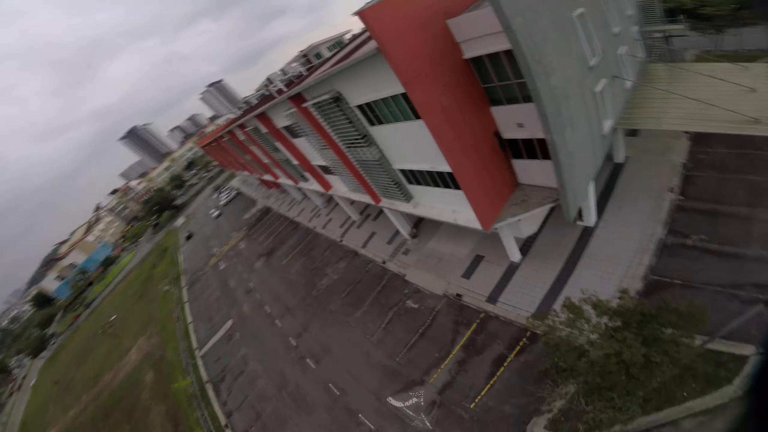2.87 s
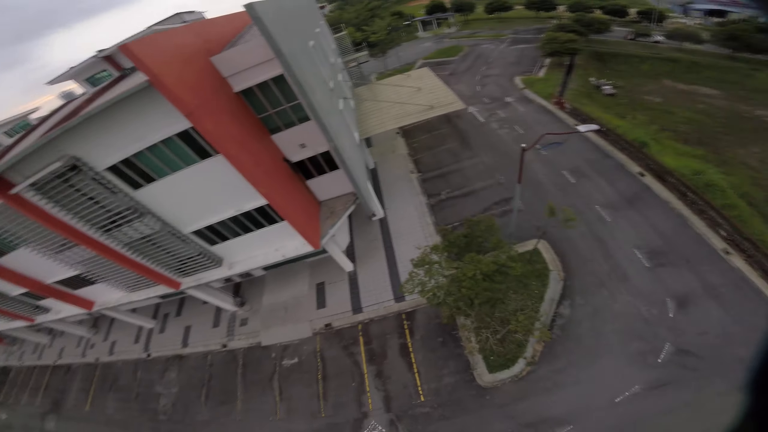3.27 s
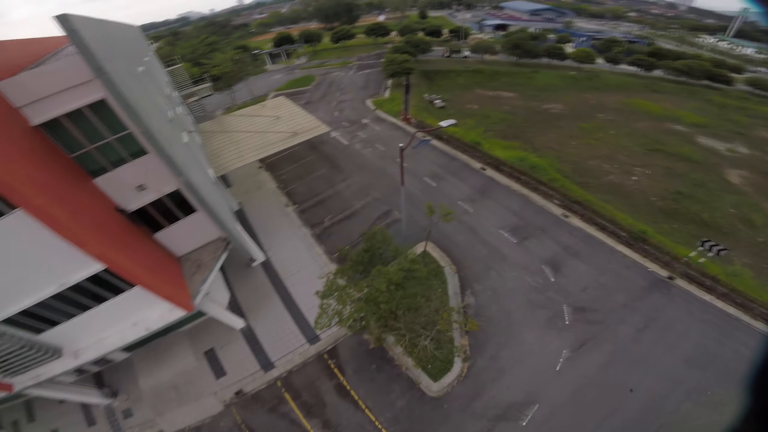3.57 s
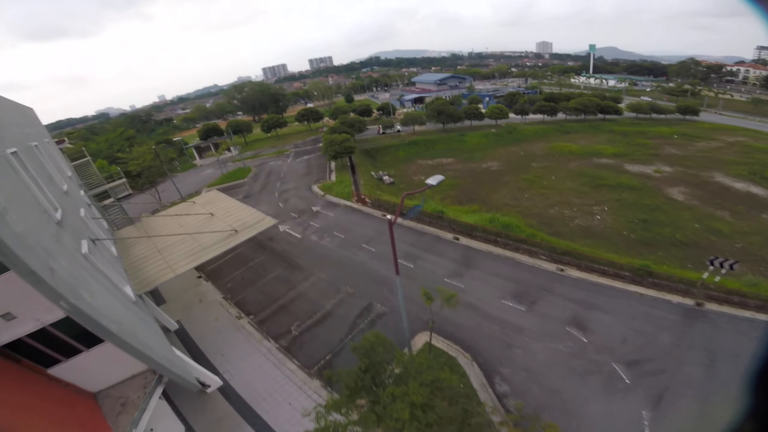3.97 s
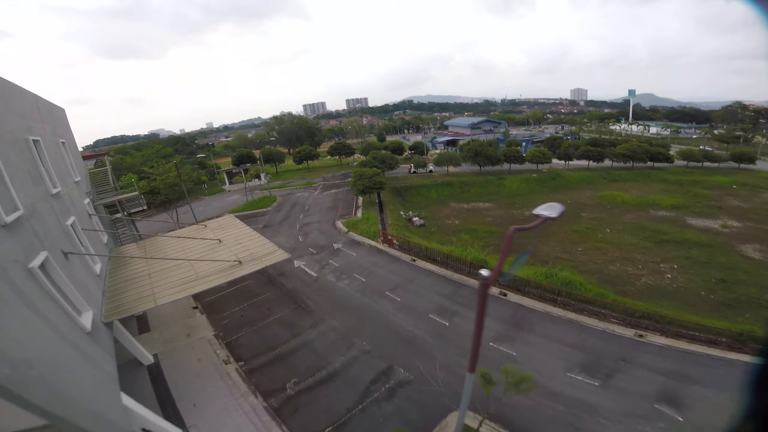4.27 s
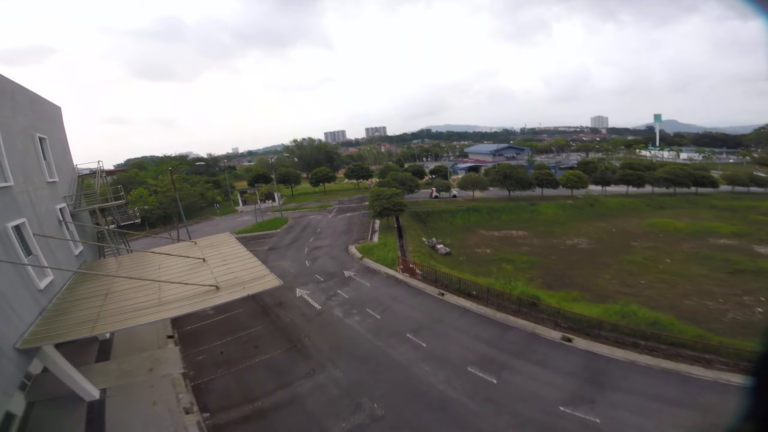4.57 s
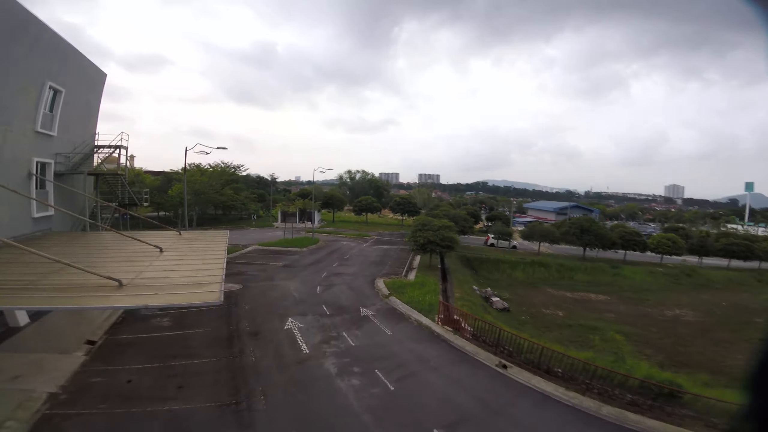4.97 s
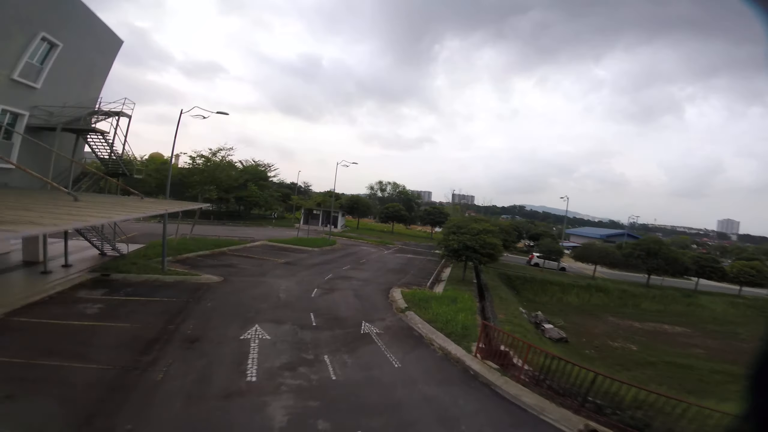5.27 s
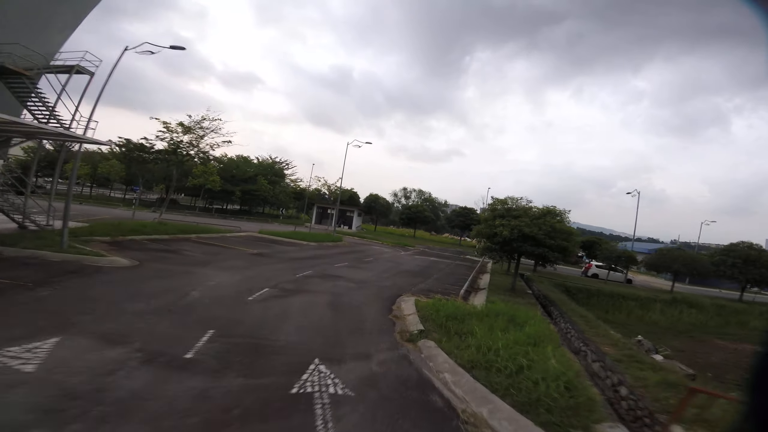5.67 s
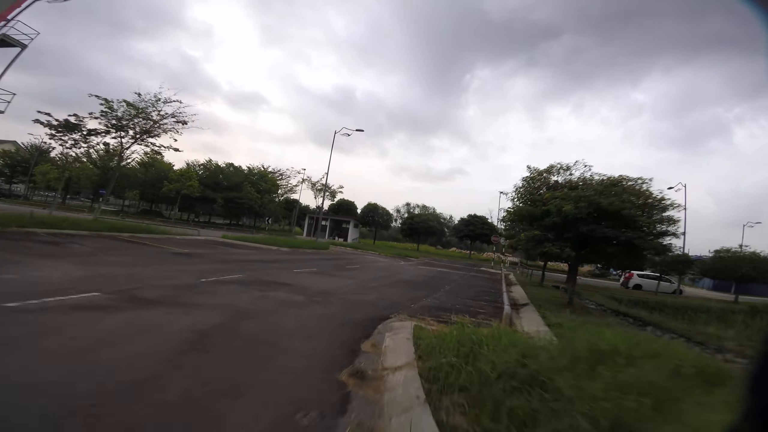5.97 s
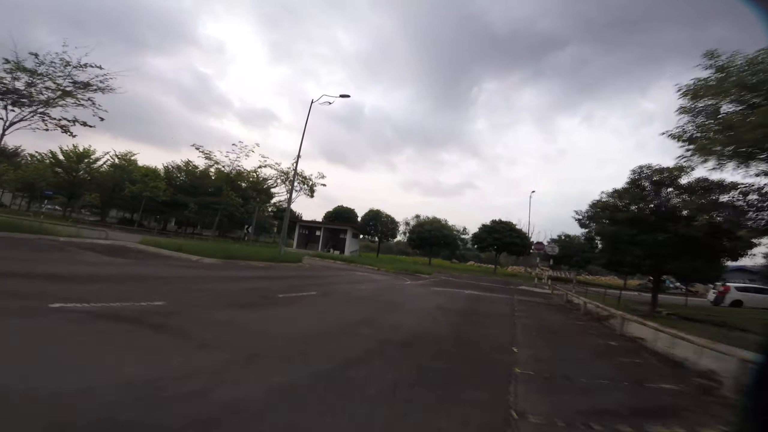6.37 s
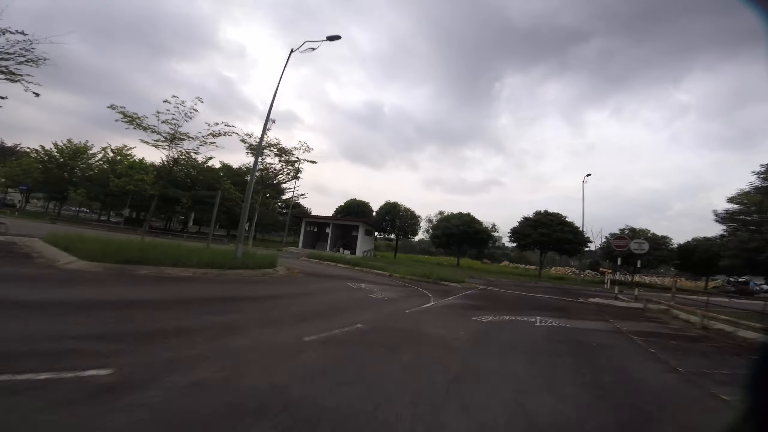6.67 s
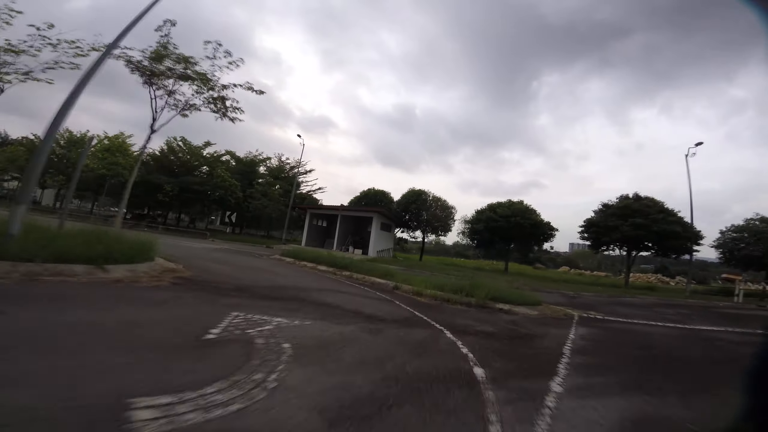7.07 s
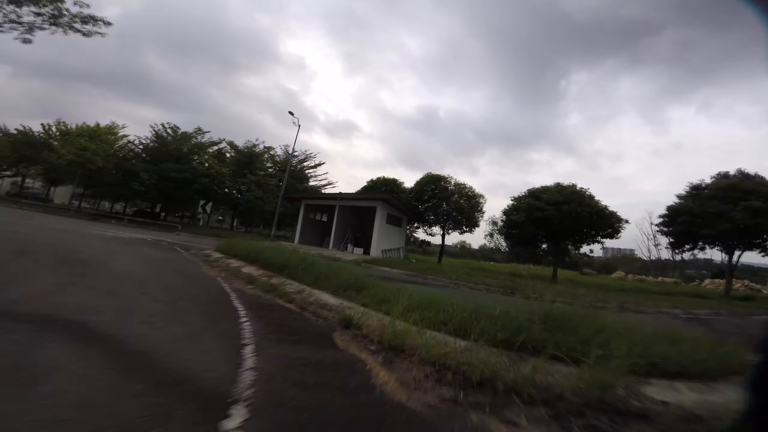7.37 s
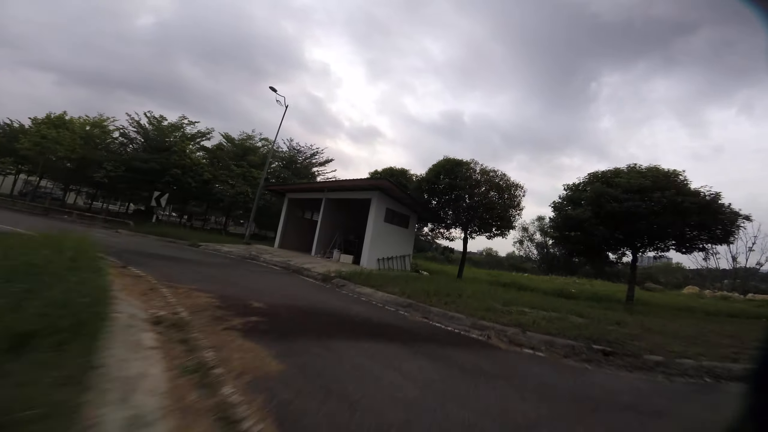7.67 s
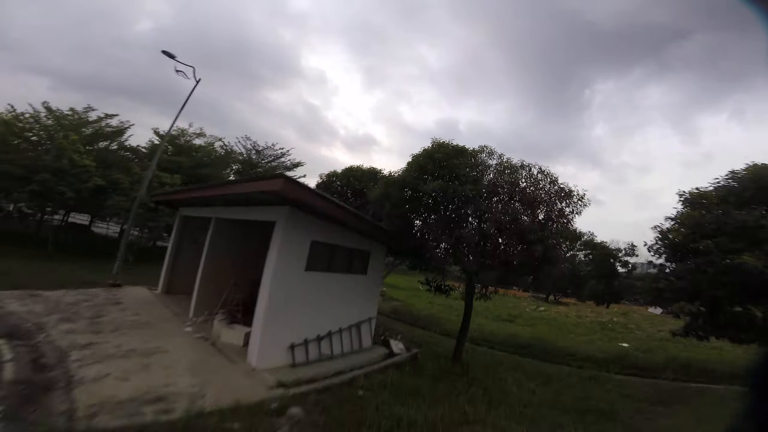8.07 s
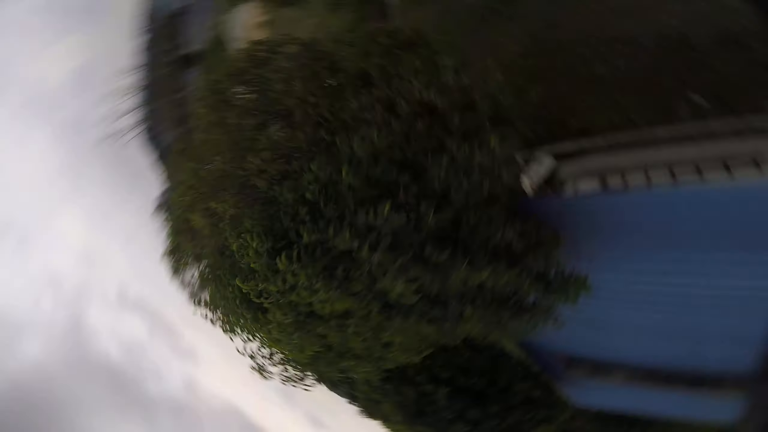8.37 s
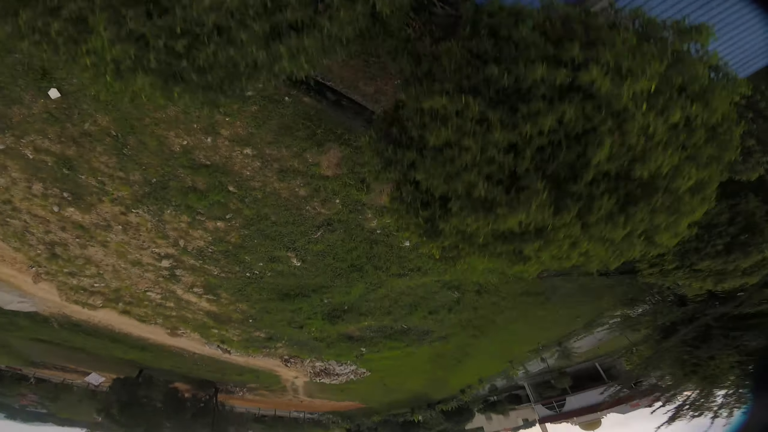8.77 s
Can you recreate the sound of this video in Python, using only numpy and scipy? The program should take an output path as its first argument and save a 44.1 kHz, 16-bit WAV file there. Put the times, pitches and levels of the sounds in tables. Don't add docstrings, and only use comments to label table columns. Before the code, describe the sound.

Heard from on board a small drone outdoors, four propeller motors whine in a rough, beating chord with frame rattle and airy hiss. Pitch rises early, dips, and swoops repeatedly. Near the end it races to a scream, drops abruptly to a low idle with tiny squeaks and a knock, then power returns. The microphone is very close and compressed.

```python
import sys
import numpy as np
from scipy import signal
from scipy.io import wavfile
from scipy.ndimage import uniform_filter1d

SR = 44100
rng = np.random.default_rng(int(sys.argv[2]) if len(sys.argv) > 2 else 0)


def generate_wav(sig):
    pcm = np.round(np.clip(np.atleast_2d(sig).T, -1, 1) * 32767).astype(np.int16)
    wavfile.write(sys.argv[1], SR, pcm)


def volts(x):
    e = np.asarray(x, float) / 20
    return 10 ** e


N = 393813
T = np.arange(N) / SR
STEP = 64
LOADED_HZ = 158.8

# pitch_hz, level_db
CASE_PATH = [(250, -8.5), (700, 9), (1000, 2), (1300, 2), (1600, -18), (2200, -4.5), (3000, -14),
             (4300, -21), (6500, -18), (8000, -19), (11000, -40)]
# time_s, load_db, speed_unrest_percent
BLADE_LOAD = [(0, 0, 0.37), (.4, 0, 0.35), (.6, -1.8, 0.608), (1.4, 0.6, 0.382), (1.7, 2.5, 0.31),
              (2.3, 0.5, 0.497), (2.8, 0.6, 0.614), (3.1, -2.1, 1.5), (3.35, 0.2, 1.5), (3.65, -3.5, 1.082),
              (4.15, -4, 1.09), (4.7, 0.2, 0.422), (5.2, 1, 0.412), (6.1, 0.7, 0.41), (6.5, 1.35, 0.526),
              (7.5, 2, .5), (8.68, -3.5, 1.6), (8.93, 0.5, .6)]


def evened(x):
    return x / np.sqrt(np.mean(x ** 2) + 1e-20)


def curves(rows):
    s, *columns = np.transpose(rows)
    return np.array([np.interp(T, s, column) for column in columns])


def swells(rows):
    return sum(np.array(db)[:, None] * np.exp(-((T - s) / half) ** 2) for s, half, *db in rows)


def fine(x):
    return np.interp(np.arange(N) / STEP, np.arange(len(x)), x)


def read(spectrum, hz):
    f, level_db = np.transpose(spectrum)
    return np.interp(np.log(hz + 1), np.log(f), level_db, left=-90, right=-90)


def wander(top_hz):
    margin = 400
    x = rng.standard_normal(len(T[::STEP]) + 2 * margin)
    lowpass = signal.butter(2, top_hz, fs=SR / STEP, output="sos")
    return evened(signal.sosfiltfilt(lowpass, x)[margin:-margin])


def fuzzy(hz, width):
    r = np.exp(-np.pi * width / SR)
    stir = rng.standard_normal(N) + 1j * rng.standard_normal(N)
    band = signal.lfilter([1], [1, -2 * r, r * r], stir)
    carrier = np.exp(2j * np.pi * np.cumsum(hz * np.ones(N)) / SR)
    return evened((band * carrier).real)


def noise(spectrum, size, patchy_db, flicker_db):
    hz = np.fft.rfftfreq(size, 1 / SR)
    frames = 4 * N // size + 5
    real, imaginary, patches = rng.standard_normal((frames, len(hz), 3)).T
    patches = uniform_filter1d(patches, size=6, axis=0)
    patches = evened(uniform_filter1d(patches, size=10, axis=1))
    flicker = evened(uniform_filter1d(rng.standard_normal(frames), size=4))
    level_db = read(spectrum, hz)[:, None] + patchy_db * patches + flicker_db * flicker
    bins = (real + 1j * imaginary) * volts(level_db)
    return evened(signal.istft(bins, nperseg=size, noverlap=3 * size // 4)[1][:N])


def shafts():
    # start_s, end_s, shaft_speed_reached_hz
    stick_moves = [(0.411, 0.581, 284.6), (.58, .83, 300.6), (.83, 1.112, 264), (1.11, 1.329, 203.4),
                   (1.461, 1.581, 218.4), (1.581, 2.138, 233), (2.16, 2.39, 155), (2.463, 2.627, 186.6),
                   (2.65, 2.779, 206.3), (2.781, 2.9, 257.1), (3.056, 3.28, 250.2), (3.296, 3.601, 256),
                   (3.769, 4.17, 179), (4.199, 4.459, 174.1), (4.598, 5.151, 185.4), (5.156, 5.288, 236.1),
                   (5.381, 5.572, 173), (5.69, 5.93, 250.8), (6.32, 6.481, 156.4), (6.803, 7.021, 199.1),
                   (7.271, 7.602, 248), (7.598, 7.85, 266), (7.86, 8.087, 433.9), (8.089, 8.155, 442),
                   (8.185, 8.25, 180), (8.25, 8.33, 90), (8.36, 8.47, 106), (8.49, 8.62, 85.05),
                   (8.8, 8.92, 160.2)]
    # time_s, then second, third and fourth motor, each percent_below_lead
    lean = [(0, 5.1, 9.8, 10.5), (.41, 0.075, 3.5, 5.25), (.85, 3, 8.23, 10.9), (1.3, 0.82, 5.66, 9.2),
            (1.77, 0.12, 4.08, 19.7), (2.35, 2.09, 5.5, 24.2), (2.75, 2.1, 10.6, 21.5),
            (3.28, 5.2, 12, 20.1), (3.8, 2.87, 8.1, 8.93), (4.6, 0.59, 2.2, 14.9), (5.03, 0.65, 17.1, 22.7),
            (5.3, 3.55, 12.9, 15.5), (5.57, 2.5, 7.4, 8.5), (6.3, 3.56, 4.4, 5.66), (6.75, 7.95, 14.2, 16),
            (7.0, 0.087, 9.57, 13.4), (8.18, 3.76, 4.6, 5.84), (8.3, 5, 17.7, 26)]
    was = 221.84
    lead = np.full(N, was)
    for start, end, hz in stick_moves:
        lead = lead + (hz - was) * np.clip((T - start) / (end - start), 0, 1)
        was = hz
    lead = uniform_filter1d(lead, size=1500, mode="nearest")
    return lead * np.vstack([np.ones(N), 1 - curves(lean) / 100])


def rattle_of(lead):
    idle_db_per_octave = 8
    idle_octaves = np.minimum(np.log2(lead / LOADED_HZ), 0)
    return -22.5 + curves(BLADE_LOAD)[0] + idle_db_per_octave * idle_octaves


def motors():
    # multiple_of_shaft_speed, level_against_blade_tone_db
    blade_orders = [(3, 0.5), (6, -23.5), (9, -34.5), (12, -47.5)]
    # multiple_of_shaft_speed, level_against_rattle_db
    motor_orders = [(4, -11.5), (5, -14), (7, -9.5), (14, -9), (42, -20)]
    # imbalance_db, blade_tone_db
    motor_build = [(0, 0.06), (-8, -2.5), (-3.5, 0), (-2, 3)]
    # shaft_speed_hz, level_db
    frame_path = [(50, -36), (110, -22), (150, -21), (185, -18.5), (205, -8), (255, -1.97), (300, -4.5),
                  (480, -12)]
    # pitch_hz, level_against_rattle_db
    arm_path = [(150, 9), (370, 1), (460, 0.5), (560, -1), (660, 1), (710, -0.5), (900, 0.2), (1450, -0.5)]
    # centre_s, half_length_s, blade_tone_db, shake_db
    manoeuvres = [
        [(1.7, 0.19, 6.5, 3), (2.5, 0.23, 10.5, 5.2), (3.9, 0.3, -1, -2.5), (4.9, 0.38, 0.5, -4.5),
         (6.3, 0.37, -9, 1), (7.1, .2, 3, 2.5), (8.1, 0.095, -8, 3.5), (8.88, .08, 11.5, 5.5)],
        [(0.41, 0.063, -6, -10), (8.12, 0.13, 4.5, -1.5), (1.75, .2, -2, -8.5), (3.45, 0.074, -8.5, -11.5),
         (7.9, .07, 12, 4), (5.9, .25, 1.5, 2), (7.5, 0.25, 3, 4)],
        [(.1, 0.19, -10, -3.5), (1.45, .1, 4, 4), (1.9, 0.4, 0.5, 6), (5.2, 0.39, 5.5, -0.7),
         (6.05, 0.22, -11, -2), (6.8, 0.34, 7.5, 6), (7.8, 0.095, -12, 0.7), (8.6, .2, -7, -0.7)],
        [(2.5, 0.35, 8, 0.8), (8.6, .2, -9, .1), (3.6, .15, -1.5, 8.5), (5.0, 0.22, 2.5, -0.8),
         (5.85, 0.079, 2, 3), (6.55, .2, -13.5, 4.5), (8.1, .12, -2, -10)],
    ]

    speeds, out = shafts(), np.zeros(N)
    rattle_db = rattle_of(speeds[0])[::STEP]
    load_db, unrest = curves(BLADE_LOAD)[:, ::STEP]
    for hz, (imbalance_db, tone_db), rows in zip(speeds[:, ::STEP], motor_build, manoeuvres):
        bite_db, press_db = swells(rows)[:, ::STEP]
        hz = hz * (1 + abs(unrest) / 100 * wander(top_hz=6))
        octaves = np.log2(hz / 200)

        shake_db = read(frame_path, hz) + imbalance_db + press_db + 0.33 * load_db
        shake_db = shake_db + 3 * wander(top_hz=6.5)
        blade_db = rattle_db + read(arm_path, 3 * hz) + tone_db + 0.8 * load_db + bite_db
        blade_db = blade_db + 2.5 * wander(top_hz=3.5)

        trembling_hz = hz * (1 + 0.002834 * wander(top_hz=31.0))
        turns = np.cumsum(fine(trembling_hz)) / SR + rng.random()
        out += volts(fine(shake_db) + 7.0) * np.sin(2 * np.pi * turns)

        wobble_db = 0.3 * shake_db + 0.7 * rattle_db - 4 + 5 * octaves
        tones = [(2, wobble_db)]
        for k, db in blade_orders:
            sharper_db = (k > 4) * 13.0 * octaves
            tones.append((k, blade_db + 5.0 + db + sharper_db))
        for k, db in motor_orders:
            tones.append((k, rattle_db + db + read(CASE_PATH, k * hz)))
        for k, level_db in tones:
            loudness = volts(level_db + 0.82 * wander(top_hz=25.6))
            out += fine(loudness) * np.sin(2 * np.pi * (round(k) * turns + rng.random()))
    return out


def whine():
    coil_order = 42
    speeds, out = shafts(), np.zeros(N)
    for hz in speeds:
        path_db = read(CASE_PATH, coil_order * hz)
        out += volts(path_db) * fuzzy(coil_order * hz, width=200)
    return volts(rattle_of(speeds[0]) - 15) * out


def air():
    # pitch_hz, level_per_hz_db
    wind_spectrum = [(20, -22), (40, -8), (62, -7), (72, -2), (85, -10.5), (130, -10.5), (250, -5.5),
                     (400, -32.5)]
    # pitch_hz, level_per_hz_db
    buffet_spectrum = [(110, -21), (200, -2), (330, -2.5), (500, 4.5), (750, -6), (1000, -29)]
    # pitch_hz, level_per_hz_db
    rattle_spectrum = [(450, -28), (700, -2.5), (1000, 2.5), (1300, 4), (1420, 1.5), (1650, -16),
                       (2000, -43.5)]
    # pitch_hz, level_per_hz_db
    wash_spectrum = [(1300, -19.5), (1500, -2.5), (1650, -5.5), (2150, -0.5), (2300, -5.5), (2600, -7.5),
                     (2950, 0), (3300, -6), (3620, -11), (3950, -19.5), (4400, -34)]
    # pitch_hz, level_per_hz_db
    hiss_spectrum = [(3700, -14.5), (4200, -5.5), (5300, -2), (6600, 0), (8000, -3.5), (9300, -6.5),
                     (10500, -16), (11500, -27), (12500, -31), (14000, -31), (15200, -42.5)]
    # pitch_hz, width_hz, level_db
    mount_modes = [(73.5, 1.7, -40.5), (200, 11, -26.5), (524, 39, -38.5)]
    # centre_s, half_length_s, level_above_wind_db
    gusts = [(0.55, 0.76, 4.5), (2.65, .1, 4), (3.75, 0.098, 9), (4.85, .15, 6), (6.15, .15, 6.5),
             (5.5, .15, 6.5), (4.4, 0.11, -6.5), (2.95, 0.28, 15.5), (5.17, 0.2, 6), (5.855, 0.15, 7),
             (6.398, .12, 5), (8.08, 0.14, 12.5), (8.407, 0.15, 13.5), (8.592, 0.15, 3.5), (3.9, .4, -5.5),
             (7.4, 0.26, 5.5), (6.6, 0.2, 2.5)]

    lead = shafts()[0]
    octaves = np.log2(np.maximum(lead, 130) / 200)
    wind_db = -27.5 + swells(gusts)[0]
    rattle_db = rattle_of(lead)
    hiss_octaves = np.log2(np.clip(lead, LOADED_HZ, 274) / 200)
    hiss_db = rattle_db - 20.5 + 6.5 * hiss_octaves
    gust_db = 0.14 * fine(wander(top_hz=25))

    wind = volts(wind_db + 5.5) * noise(wind_spectrum, size=4096, patchy_db=4.0, flicker_db=-1.5)
    buffet_db = rattle_db + 3.5 - 12.0 * octaves
    buffet = volts(buffet_db) * noise(buffet_spectrum, size=1024, patchy_db=1.0, flicker_db=1.7)
    rattle = volts(rattle_db + 2.5) * noise(rattle_spectrum, size=1024, patchy_db=1.34, flicker_db=1.0)
    wash_db = 0.41 * rattle_db + 0.59 * hiss_db + 6.5 + gust_db
    wash = volts(wash_db) * noise(wash_spectrum, size=512, patchy_db=1.2, flicker_db=0.17)

    surge = np.clip(np.gradient(np.log2(lead)) * SR, -3, 3)
    surge_db = 0.3 * uniform_filter1d(surge, size=3000)
    hiss = noise(hiss_spectrum, size=256, patchy_db=1.6, flicker_db=0.2)
    hiss = volts(hiss_db + 2.0 + gust_db + surge_db) * hiss
    dull = signal.sosfiltfilt(signal.butter(4, 7600, fs=SR, output="sos"), hiss)
    hiss = dull + volts(4.3 * octaves) * (hiss - dull)

    mount = sum(volts(db) * fuzzy(hz, width) for hz, width, db in mount_modes)
    return wind + buffet + rattle + wash + hiss + mount


def throttle_cut():
    # time_s, pitch_hz, level_db
    idle_whistle = [
        (8.48, 7060, -82),
        (8.536, 7410, -57),
        (8.8, 7050, -56),
    ]
    # centre_s, pitch_hz, width_hz, length_s, level_db
    catches = [
        (8.421, 5340, 597, 0.014, -35),
        (8.424, 7420, 880, 0.0096, -30),
        (8.437, 7140, 1500, 0.025, -36),
        (8.42, 9740, 3000, 0.011, -52.5),
        (8.441, 552.4, 200, 0.035, -6.5),
        (8.824, 6900, 900, 0.041, -40),
    ]
    hz, level_db = curves(idle_whistle)
    start, end = idle_whistle[0][0], idle_whistle[-1][0]
    on = np.interp(T, [start - 0.03, start, end, end + 0.03], [0, 1, 1, 0])
    out = on * volts(level_db + 5) * fuzzy(hz, width=170)
    for s, hz, width, length, db in catches:
        burst = np.exp(-((T - s) / length * 2) ** 2)
        out += volts(db) * burst * fuzzy(hz, width)
    return out


def scene():
    return (motors() + whine() + air() + throttle_cut())[None]


def excess_db(x, size, recover_db_per_s, ceiling_db):
    power_db = 10 * np.log10(abs(uniform_filter1d(x[0] ** 2, size=size)) + 1e-12)
    fall = T * recover_db_per_s
    held_db = np.maximum.accumulate(power_db + fall) - fall
    return np.maximum(held_db - ceiling_db, 0)


def slow_gain(x):
    over_db = excess_db(x, size=3000, recover_db_per_s=12, ceiling_db=-8.5)
    return x / volts(0.56 * uniform_filter1d(over_db, size=2000, mode="nearest"))


def quick_gain(x):
    over_db = excess_db(x, size=300, recover_db_per_s=280.0, ceiling_db=-5.5)
    return x / volts(0.44 * uniform_filter1d(over_db, size=150))


def band_limit(x):
    return signal.sosfilt(signal.butter(12, 15073, fs=SR, output="sos"), x)


def record(dry):
    ducked = quick_gain(slow_gain(dry))
    mix = 1.084 * np.tanh(ducked / 1.193)
    return band_limit(mix)


dry = scene()
out = record(dry)
generate_wav(out)
```